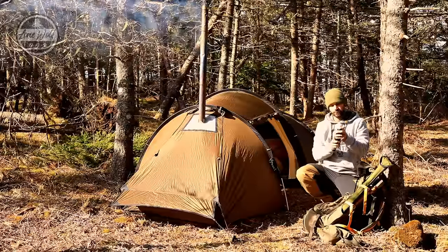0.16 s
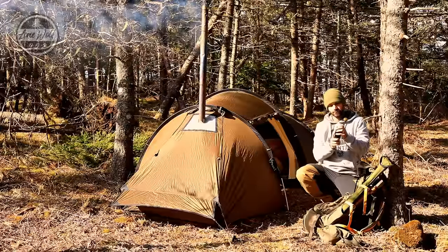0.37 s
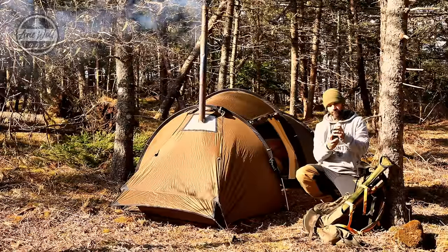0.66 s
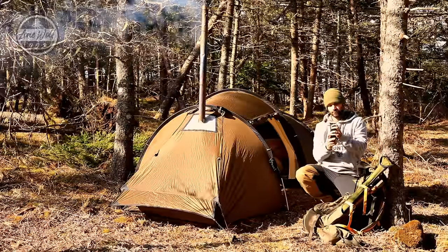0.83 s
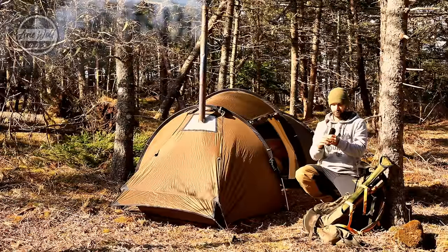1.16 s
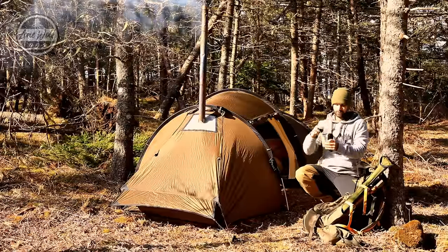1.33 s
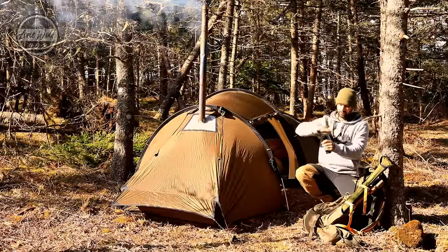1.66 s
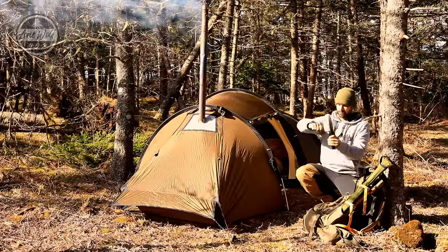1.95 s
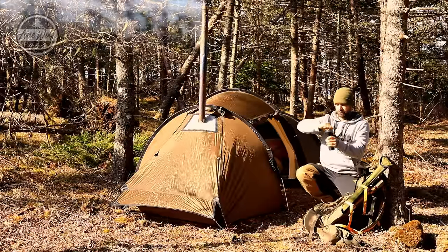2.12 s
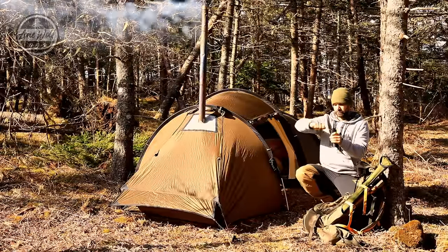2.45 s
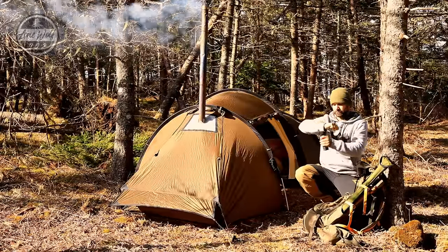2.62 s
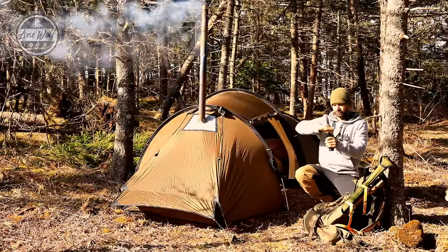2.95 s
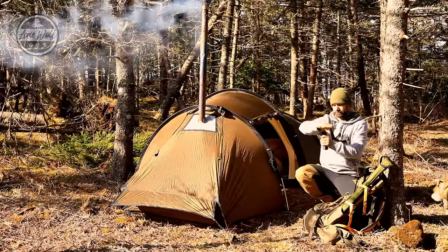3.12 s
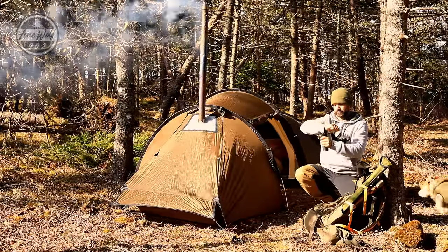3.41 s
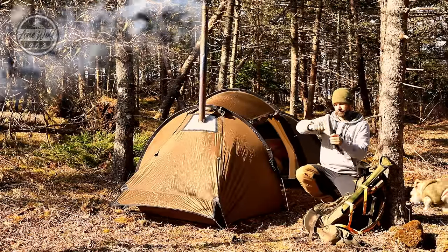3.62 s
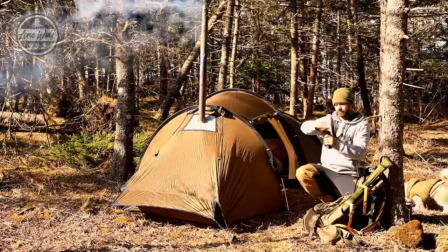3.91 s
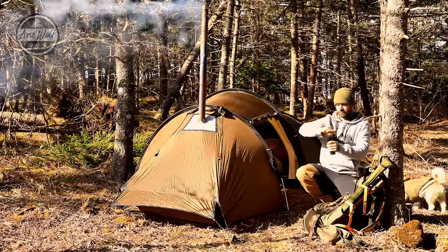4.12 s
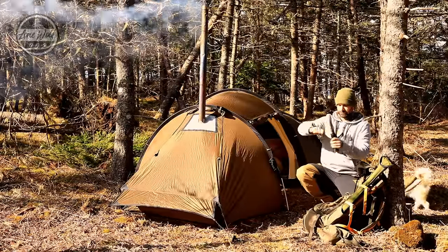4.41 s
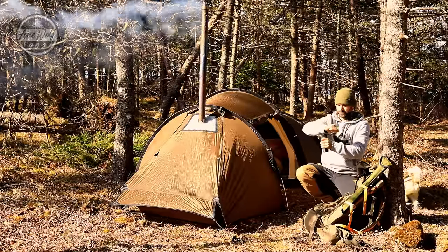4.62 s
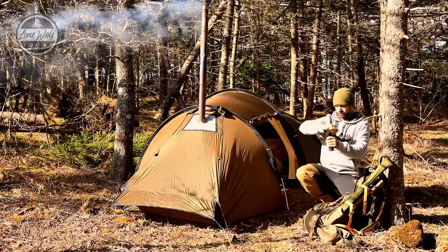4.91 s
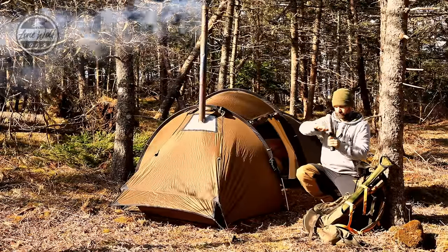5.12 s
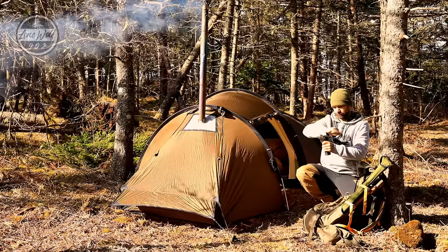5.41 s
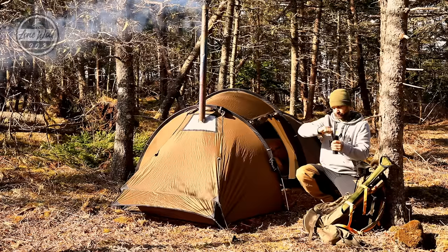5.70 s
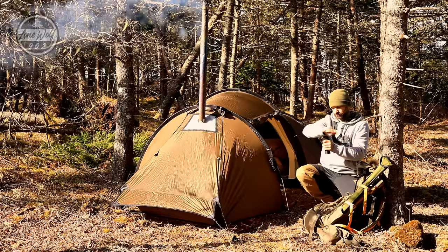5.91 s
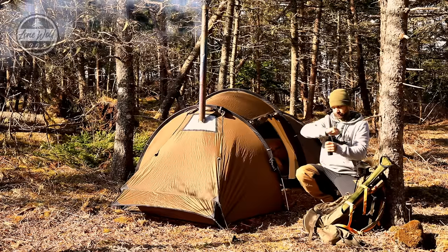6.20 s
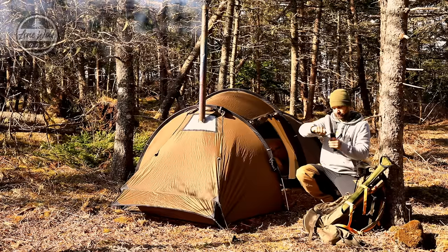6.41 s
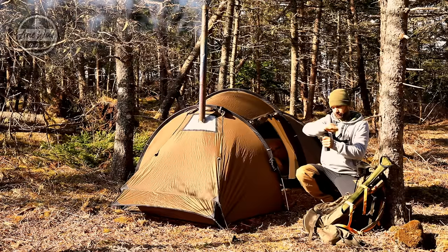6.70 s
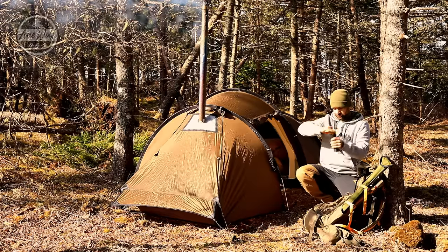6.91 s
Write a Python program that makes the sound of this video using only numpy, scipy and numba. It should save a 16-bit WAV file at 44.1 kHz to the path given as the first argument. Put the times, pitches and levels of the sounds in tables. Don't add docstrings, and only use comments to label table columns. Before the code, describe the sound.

Coffee beans rattle in a hand mill, its cap snaps on, then uneven crunchy cranking grinds to the end amid soft forest wind.

```python
import sys
import numpy as np
from scipy import signal
from scipy.io import wavfile
from scipy.ndimage import uniform_filter1d
from numba import njit

SR = 44100
rng = np.random.default_rng(int(sys.argv[2]) if len(sys.argv) > 2 else 0)


def volts_from_decibels(level):
    exponent = np.asarray(level, float) / 20
    return 10 ** exponent


def store_pcm(level_fs):
    pcm = np.round(np.clip(level_fs, -1, 1) * 32767).astype(np.int16)
    wavfile.write(sys.argv[1], SR, np.atleast_2d(pcm).T)


N = 311346
T = np.arange(N) / SR
CRANK_START_S = 1.705

# centre [Hz], width [Hz], level [dB].
GRIT_MODES = [(7360, 1800, -8), (9940, 2500, 4.5), (11750, 2200, -2), (12900, 1900, 0)]
# time [s], load on the burrs [dB],
# upper body re load [dB], hollow between hand and mill [Hz].
HANDLE_PUSHES = [(1.73, -44, 1, 2860), (1.95, -43.5, -1, 2300), (2.13, -47.5, -1, 2570),
                 (2.23, -46, -0.5, 2290), (2.42, -41, 1.5, 2410), (2.68, -41.5, -1, 2870),
                 (2.79, -42, -2.5, 2250), (2.92, -42, -2.5, 3100), (3.04, -44.5, -1, 2840),
                 (3.21, -41.5, 0.5, 2510), (3.44, -45, 1, 2750), (3.67, -40.5, -0.5, 2390),
                 (3.86, -44, -0.5, 2960), (4.03, -42, -2.5, 2680), (4.23, -43, 2.5, 2600),
                 (4.44, -43, -3.5, 2400), (4.67, -42, -3, 2420), (4.76, -42, -0.5, 3060),
                 (5.05, -41, -1.5, 2430), (5.17, -41.5, -2, 2650), (5.44, -43, 0.5, 3370),
                 (5.64, -41.5, 0.5, 2840), (5.83, -40, -2, 2760), (6.0, -43.5, -2, 3040),
                 (6.2, -41, -4, 3200), (6.37, -40, -1, 2350), (6.52, -43.5, -0.5, 2730),
                 (6.63, -39, -2, 2930), (6.92, -43, -2, 2660), (7.03, -42.5, -3, 2900)]


def level(x, db):
    return x * volts_from_decibels(db) / np.sqrt(np.mean(x ** 2))


def walk(db, rate):
    k = max(int(SR / 32 / rate), 2)
    held = np.repeat(rng.standard_normal(N // 32 // k + 2), k)
    slewed = uniform_filter1d(uniform_filter1d(held, k), k)
    gain = volts_from_decibels(1.3 * db * slewed)
    return np.interp(np.arange(N), 32 * np.arange(len(gain)), gain)


def swell(s, db, rise_db_s, fall_db_s):
    return volts_from_decibels(db - np.where(T < s, rise_db_s * (s - T), fall_db_s * (T - s)))


def band(x, hz, width_hz):
    return signal.lfilter(*signal.iirpeak(hz, hz / width_hz, fs=SR), x)


def steep(x, hz, width_hz):
    return band(band(x, hz, 1.44 * width_hz), hz, 1.44 * width_hz)


def ring(hz, t60_s, size):
    t = T[:size]
    return np.sin(2 * np.pi * hz * t) * 1000. ** (-t / t60_s)


def grains(rate_hz, spread_db, surge_db, powder_db):
    chance = rng.random((2, N))
    size_db = np.minimum(-spread_db * np.log(1 - chance[1]), 14)
    clicks = level((chance[0] < rate_hz / SR) * volts_from_decibels(size_db), 0)
    powder = level(np.abs(rng.standard_normal(N)), powder_db)
    return (clicks + powder) * walk(surge_db, 160) * walk(surge_db, 85)


def body(clicks, modes, wander_db):
    out = np.zeros(N)
    for hz, width_hz, db in modes:
        struck = clicks * rng.standard_normal(N) * volts_from_decibels(db) * walk(wander_db, 20)
        out += steep(struck, hz, width_hz)
    power = uniform_filter1d(uniform_filter1d(out ** 2, size=2200), size=2200)
    return out / np.sqrt(power + 1e-12)


def knocks(events, t60_s, spread, thud_hz, top_hz):
    size = 2048
    out = np.zeros(N + size)
    noise = rng.standard_normal(N + size)
    fade = 1000. ** (-T[:size] / t60_s)
    for s, db, hz, thud_db, top_db in events:
        at = slice(int(s * SR), int(s * SR) + size)
        burst = noise[at] * fade
        burst[0] = 4
        splinters = steep(burst, hz, spread * hz)
        thud = steep(burst, thud_hz, 0.89 * thud_hz)
        splash = steep(burst * fade, top_hz, 3400)
        for part, part_db in ((splinters, 0), (thud, thud_db), (splash, top_db)):
            out[at] += volts_from_decibels(db + part_db) * part / np.abs(part).max()
    return out[:N]


def air(spectrum, per_octave, swell_db, flicker_db, flicker_rate):
    hz, db = np.transpose(spectrum)
    octaves = np.arange(0, np.log2(hz[-1] / hz[0]), 1 / per_octave)
    out = np.zeros(N)
    for f in hz[0] * 2 ** octaves:
        noise = steep(rng.standard_normal(N), f, .3 * f)
        band_db = np.interp(np.log(f), np.log(hz), db)
        out += noise * volts_from_decibels(band_db) * walk(flicker_db, flicker_rate)
    return level(out * walk(swell_db, .7), 0)


def wind():
    # time [s], rumble [dB].
    gusts = [(0.0, -41), (0.27, -40.5), (1.08, -42.5), (1.16, -40), (1.69, -40), (1.87, -46.5),
             (1.97, -39.5), (2.5, -43), (2.77, -38.5), (2.85, -45.5), (2.95, -37.5), (3.38, -42),
             (5.11, -40), (5.19, -46), (5.35, -41), (5.74, -44.5), (5.84, -42), (7.06, -40)]
    # frequency [Hz], density [dB per Hz].
    rumble_spectrum = [(8.2, -29), (14, -1.5), (27, 3.5), (45, 0.5), (78, -4), (123, -17.5), (178, -19),
                       (260, -29.5), (340, -52), (570, -120)]
    # frequency [Hz], density [dB per Hz].
    needle_spectrum = [(100, -33), (200, -4.5), (400, 0.5), (800, -2.5), (1600, -10), (2600, -17.5),
                       (5000, -23.5), (10000, -27), (16000, -28)]
    gust_s, gust_db = np.transpose(gusts)
    rumble_db = np.interp(T, gust_s, gust_db) + 1.5
    rumble = air(rumble_spectrum, per_octave=2.4, swell_db=0.52, flicker_db=1.0, flicker_rate=5)
    hiss = air(needle_spectrum, per_octave=2.2, swell_db=.4, flicker_db=.8, flicker_rate=8)
    return volts_from_decibels(rumble_db) * rumble * walk(0.8, 7) + volts_from_decibels(-48) * hiss


def bean_rattle():
    # time [s], fade [s], rattle [dB], top re rattle [dB].
    shake_rows = [(.124, 0.043, -53, -18), (.215, 0.044, -47, -11), (.31, 0.13, -53.5, -15),
                  (.39, .04, -53.5, -15), (.465, 0.024, -46, -26), (.5, 0.04, -40, -28),
                  (.6, .05, -53, -16), (.694, .03, -53, -8), (.742, 0.044, -53, -16), (.782, .02, -52, -20),
                  (.816, .07, -54, -10), (.89, 0.054, -52.5, -14), (1.068, 0.092, -62, -5),
                  (1.278, .05, -58, -1), (1.44, .05, -60, -3), (1.52, .05, -63, 2)]
    # centre [Hz], width [Hz], level [dB].
    shell_modes = [(1680, 600, -2.5), (3610, 600, 0), (4360, 2100, -6), (6000, 4500, -14)]
    rise_ratio, rest_db = 0.38, -67.5
    shakes = [swell(s, db, 10 / (rise_ratio * fade_s), 10 / fade_s) for s, fade_s, db, _ in shake_rows]
    tops = [shake * volts_from_decibels(row[3]) for shake, row in zip(shakes, shake_rows)]
    beans = grains(rate_hz=3100, spread_db=4.0, surge_db=1.0, powder_db=-10)
    shell = (np.max(shakes, axis=0) + volts_from_decibels(rest_db)) * body(beans, shell_modes, wander_db=-4.5)
    top = np.max(tops, axis=0) * body(beans, GRIT_MODES, wander_db=0.0)
    return (T < CRANK_START_S) * (shell + top)


def ticks():
    # time [s], peak [dB], ring [Hz], low thud re peak [dB], top re peak [dB]. The rows from
    # 1.7 s on are the bright tops of splitting beans.
    tick_rows = [(0.1236, -47, 3710, -16, -18), (0.3097, -47, 4640, -16, -15),
                 (0.3347, -34, 4270, -16, -19), (0.3414, -38, 4320, -16, -10), (0.3914, -47, 3850, -16, -7),
                 (0.5871, -20, 4360, -13, -19), (0.6934, -50, 3920, -16, 1), (0.7326, -29, 4460, -21, -17),
                 (0.7766, -41, 4310, -16, -22), (0.8135, -41, 4050, -16, -11), (0.888, -37, 3730, -16, -16),
                 (0.9774, -43, 3630, -16, 7), (1.708, -40, 5000, -16, -2), (2.0231, -39, 5000, -16, -4),
                 (2.438, -42, 5200, -16, 9), (5.7665, -37, 4800, -16, -2), (5.998, -30.5, 5550, -24, -26)]
    delayed = np.add(tick_rows, [.0007, 0, 0, 0, 0])
    return knocks(delayed, t60_s=.006, spread=.8, thud_hz=1900, top_hz=8500)


def cap_snap():
    # time [s], level [dB].
    snap_blows = [
        (.4885, -8),
        (.4906, -9),
        (.4922, -14),
    ]
    # frequency [Hz], level [dB], t60 [s].
    cap_modes = [(1134, -16, .15), (1168, -16, .15), (1190, -1, .011), (1450, -4, .012), (1700, -6, .01),
                 (2300, -2, .011), (2600, 2, .014), (3128, -3, .012), (3585, -6, .015), (4900, -9, .01),
                 (5911, -13, .01), (7400, -15, .006), (8900, -12, .006), (11500, -12, .005)]
    blows = np.zeros(N)
    for s, db in snap_blows:
        blows[int(s * SR):][:3] = volts_from_decibels(db - 3.5) * np.array([.5, 1, .5])
    ringing = sum(-volts_from_decibels(db - 9.5) * ring(hz, t60_s, size=8192) for hz, db, t60_s in cap_modes)
    cap = signal.fftconvolve(blows, ringing)[:N]
    cap = signal.sosfilt(signal.butter(5, 1080, "high", fs=SR, output="sos"), cap)
    cap[int(snap_blows[0][0] * SR):][:4096] += volts_from_decibels(-27) * ring(610, t60_s=0.024, size=4096)
    return cap


def effort(level_db, rise_db_s, fall_db_s, coast_db):
    swells = [swell(row[0], db, rise_db_s, fall_db_s) for row, db in zip(HANDLE_PUSHES, level_db)]
    pushes = np.max(swells, axis=0)
    return 10 * np.log10(pushes ** 2 + volts_from_decibels(coast_db) ** 2)


def burr_bite():
    # start [s], end [s], depth [dB].
    stalls = [(1.868, 1.907, -8), (2.167, 2.21, -16), (2.318, 2.357, -10.5), (2.664, 2.675, -5),
              (2.884, 2.892, -6), (3.709, 3.79, -3.5), (4.178, 4.202, -13), (4.324, 4.382, -4.5),
              (5.713, 5.764, -11.5), (5.81, 5.82, -6), (6.546, 6.6, -5.5)]
    bite = 1. * (T > CRANK_START_S)
    for start_s, end_s, db in stalls:
        bite *= volts_from_decibels(np.interp(T, [start_s - .012, start_s, end_s - .002, end_s], [0, db, db, 0]))
    return bite


@njit
def hollow(x, hz, width_hz):
    y, bp, lp = np.empty(len(x)), 0., 0.
    for i in range(len(x)):
        g, k = np.tan(np.pi * hz[i] / SR), width_hz / hz[i]
        v = (bp + g * (x[i] - lp)) / (1 + g * (g + k))
        bp, lp, y[i] = 2 * v - bp, lp + 2 * g * v, k * v
    return y


def grinding(crumbs):
    # centre [Hz], width [Hz], level [dB].
    low_modes = [(434, 230, -8), (612, 240, -7), (864, 265, 1.5), (1179, 203, 2.5), (1434, 183, -3)]
    # centre [Hz], width [Hz], level [dB].
    high_modes = [(1700, 430, -0.5), (2083, 310, 0.5), (2326, 226, -6.5), (2846, 770, -5),
                  (3150, 244, -2.5), (3490, 300, -2.5), (4050, 860, -10.5), (4830, 970, -14)]
    _, push_db, bright_db, _ = np.transpose(HANDLE_PUSHES)
    load_db = effort(push_db, rise_db_s=29, fall_db_s=40, coast_db=-52.5)
    upper_db = effort(push_db + bright_db, rise_db_s=70, fall_db_s=67, coast_db=-49)
    grit_db = -62 + 0.55 * (upper_db + 42)

    rest_hz, grip_s = 2300, 0.048
    hollow_hz = np.full(N, float(rest_hz))
    for s, _, _, hz in HANDLE_PUSHES:
        hollow_hz += (hz - rest_hz) * np.exp(-((T - s) / grip_s) ** 2)

    upper = body(crumbs, high_modes, wander_db=2.5)
    glide = hollow(hollow(upper, hollow_hz, 660.0), hollow_hz, 660.0)
    upper = level(upper + level(glide, -11) * walk(1.8, 18), 0)
    low = body(crumbs, low_modes, wander_db=2.0)
    grit = body(crumbs, GRIT_MODES, wander_db=0.0)
    sparks = grains(rate_hz=100, spread_db=4, surge_db=0.1, powder_db=-30)
    specks = level(steep(sparks, 10600, 3000), -8)
    sound = volts_from_decibels(load_db) * low * walk(0.3, 30) + volts_from_decibels(upper_db) * upper * walk(1.5, 60)
    return sound + volts_from_decibels(grit_db) * (grit * walk(2.6, 70) + specks)


def cracks():
    # time [s], peak [dB], ring [Hz], top re peak [dB].
    splits = [(1.7072, -24, 2170, -10), (1.7362, -25, 3830, -24), (1.9406, -23, 2120, -24),
              (1.9727, -28, 2100, -24), (2.2121, -30, 2280, -24), (2.3039, -31, 2360, -24),
              (2.3463, -38, 3080, -24), (2.6776, -23.5, 2380, -24), (2.791, -24.5, 2120, -24),
              (2.922, -27, 3200, -24), (2.9944, -32, 2220, -24), (3.0273, -39, 3010, -24),
              (3.2797, -26, 1980, -24), (3.802, -33, 2930, -26), (3.937, -31, 2050, -24),
              (4.026, -28, 3100, -24), (4.2062, -23, 2400, -24), (4.7579, -39, 3150, -24),
              (4.9715, -26.5, 2940, -26), (5.0327, -31, 2550, -24), (5.4316, -27, 3430, -24),
              (5.7671, -27.5, 2660, -24), (5.8219, -26, 2860, -24), (5.8527, -23.5, 3260, -24),
              (5.997, -21, 3370, -28), (6.5029, -26.5, 2930, -24), (6.533, -23.5, 2340, -24),
              (6.62, -30.5, 3220, -24), (6.666, -28, 1880, -24), (7.0167, -33, 3280, -24)]
    count = 36
    chance = rng.random((count, 3)).T
    chip_s = CRANK_START_S + chance[0] * (T[-1] - CRANK_START_S)
    chip_db = -33.5 + 4.5 * (2 * chance[1] - 1)
    chip_hz = 2070 + chance[2] ** 2 * (3400 - 2070)
    chips = np.transpose([chip_s, chip_db, chip_hz, np.full(count, -25.)])
    s, db, hz, top_db = np.vstack([splits, chips]).T
    thud_db = -3.5 - 11 * (hz / 1000 - 2)
    events = np.transpose([s, db, hz, thud_db, top_db])
    return knocks(events, t60_s=0.033, spread=0.32, thud_hz=930, top_hz=10700)


def scrapes(crumbs):
    # time [s], centre [Hz], level [dB].
    scrape_rows = [(1.72, 3620, -46), (1.735, 4900, -50), (2.42, 1200, -45), (4.45, 1150, -45),
                   (6.4, 1250, -48), (2.14, 3180, -47), (2.45, 5200, -51.5), (2.61, 3150, -41.5),
                   (3.04, 2980, -44), (3.2, 3120, -46), (3.82, 3300, -44.5), (3.95, 2060, -42),
                   (4.28, 3100, -45), (4.46, 2900, -39.5), (4.59, 3050, -42.5), (4.98, 2900, -44),
                   (5.05, 2400, -46), (5.3, 3640, -45), (5.35, 3150, -47), (5.66, 3400, -45),
                   (6.12, 3000, -43.5), (6.21, 3200, -48), (6.3, 3000, -41), (6.88, 3030, -48)]
    out, rub = np.zeros(N), crumbs * rng.standard_normal(N)
    for s, hz, db in scrape_rows:
        at = slice(int(s * SR) - 4096, int(s * SR) + 4096)
        swish = level(steep(rub[at], hz, width_hz=390), db)
        out[at] += swish * np.exp(-((T[at] - s) / 0.018) ** 2)
    return out


def mill():
    bite = burr_bite()
    crumbs = grains(rate_hz=2500, spread_db=4, surge_db=1.5, powder_db=0.5)
    steady = grinding(crumbs) + scrapes(crumbs)
    return bite * steady + np.roll(bite, -200) * volts_from_decibels(-3.5) * cracks()


def scene():
    air_noise = wind()
    near = bean_rattle() + ticks() + cap_snap() + mill()
    scatter = level(rng.standard_normal(8192) * 1000. ** (-T[:8192] / .15), -56)
    mono = near + signal.fftconvolve(near, scatter)[:N] + air_noise
    return np.array([mono, mono])


def roll_off(x):
    return signal.sosfilt(signal.butter(12, 16830, fs=SR, output="sos"), x)


def record(dry):
    treble_hiss = level(band(rng.standard_normal(N), 14400, 9200), -75)
    low_hiss = level(band(rng.standard_normal(N), 210, 190), -86)
    hiss = treble_hiss + low_hiss
    cut = signal.ellip(8, .2, 60, 15800, fs=SR, output="sos")
    mix = signal.sosfilt(cut, dry + np.array([hiss, -hiss]))
    return roll_off(mix)


dry = scene()
out = record(dry)
store_pcm(out)
```